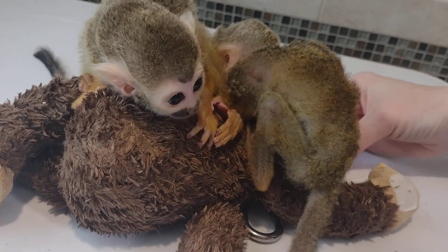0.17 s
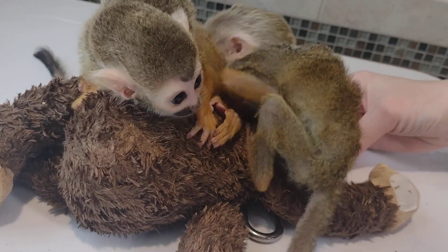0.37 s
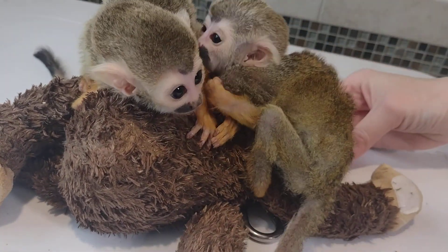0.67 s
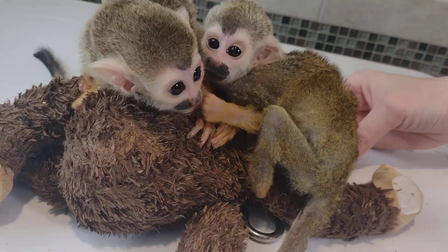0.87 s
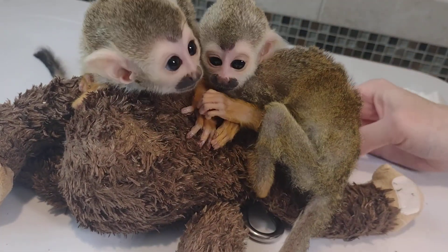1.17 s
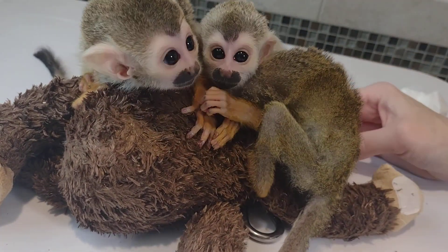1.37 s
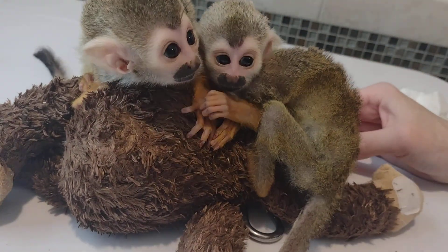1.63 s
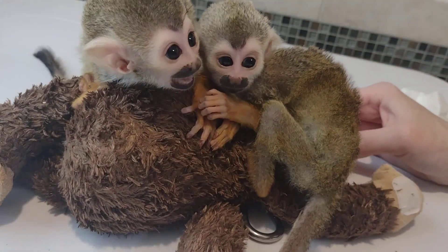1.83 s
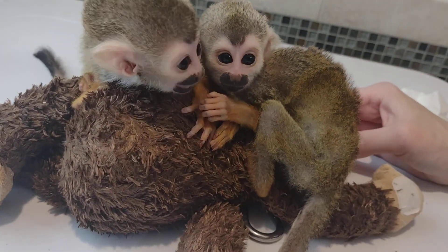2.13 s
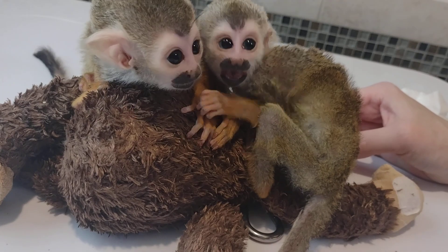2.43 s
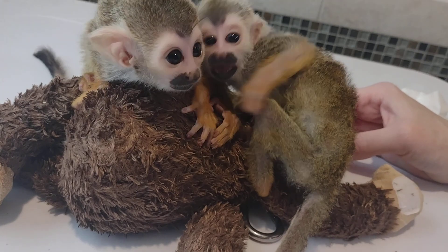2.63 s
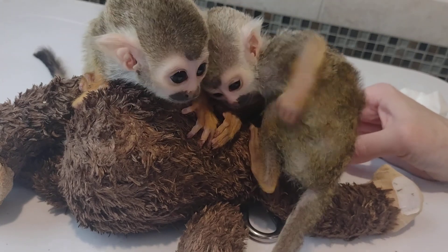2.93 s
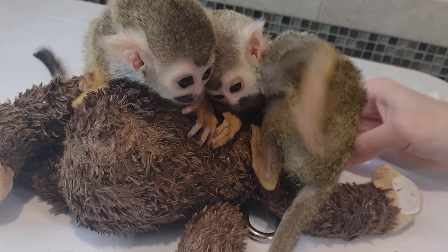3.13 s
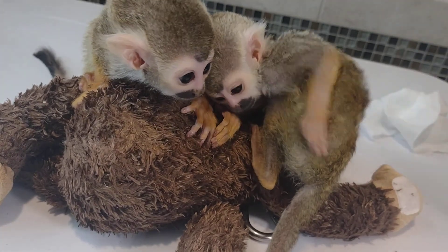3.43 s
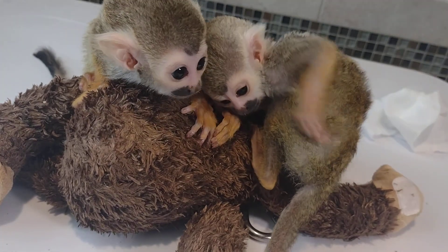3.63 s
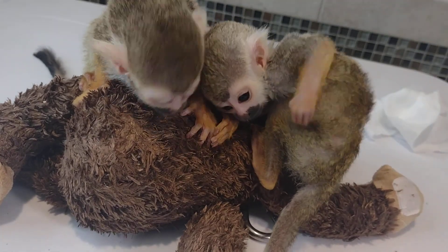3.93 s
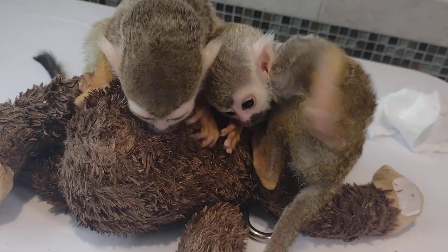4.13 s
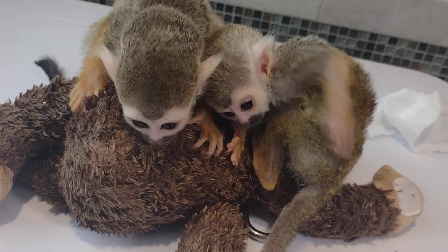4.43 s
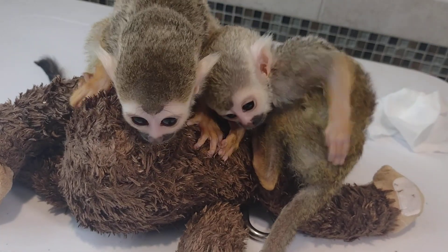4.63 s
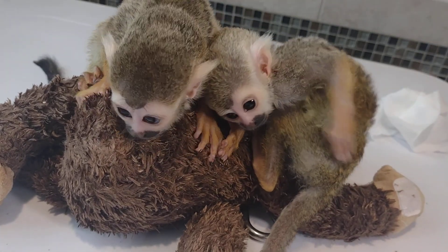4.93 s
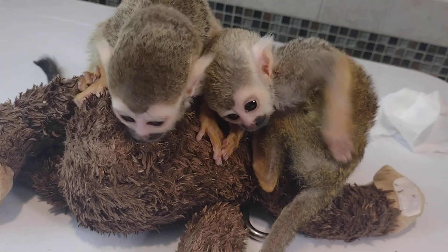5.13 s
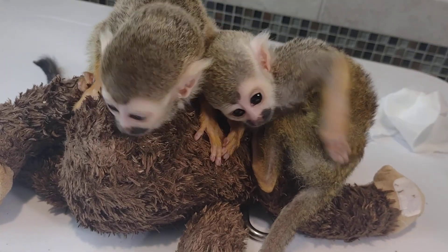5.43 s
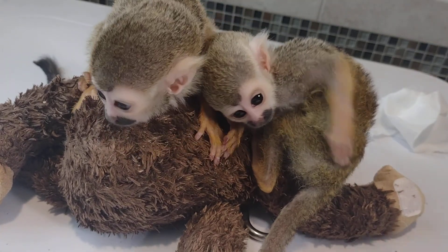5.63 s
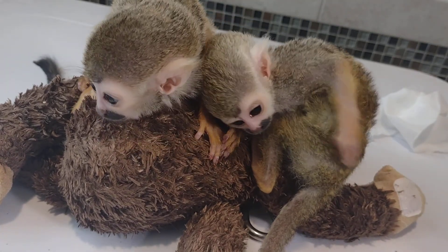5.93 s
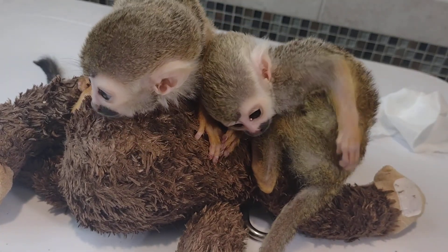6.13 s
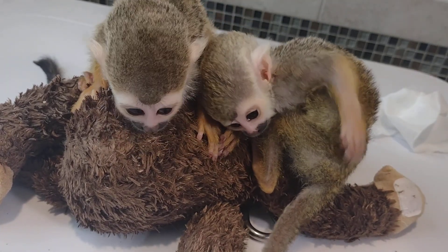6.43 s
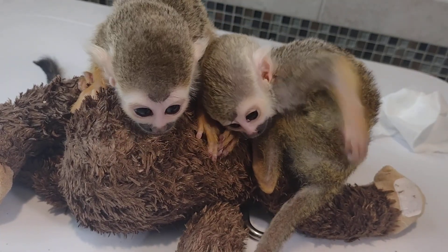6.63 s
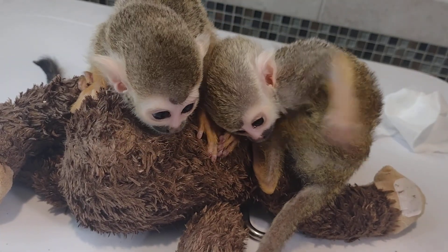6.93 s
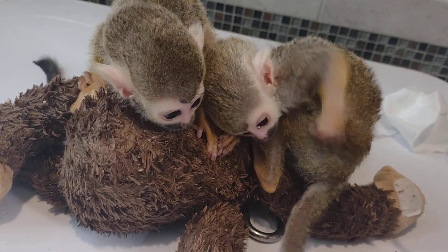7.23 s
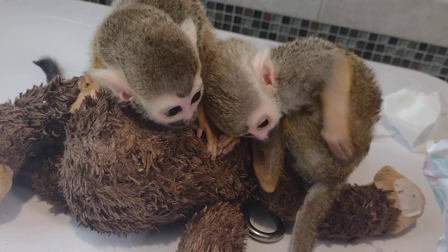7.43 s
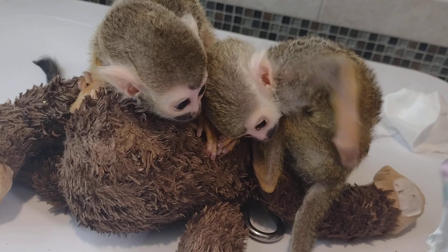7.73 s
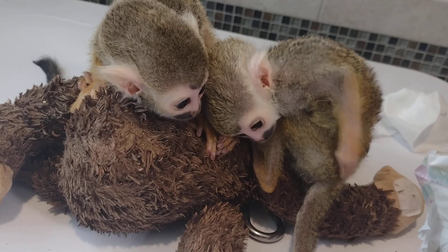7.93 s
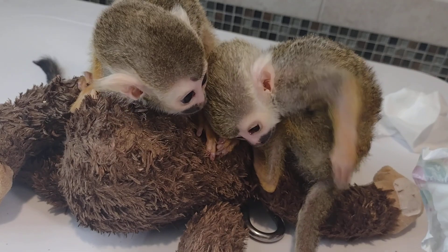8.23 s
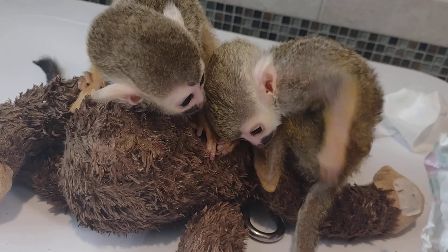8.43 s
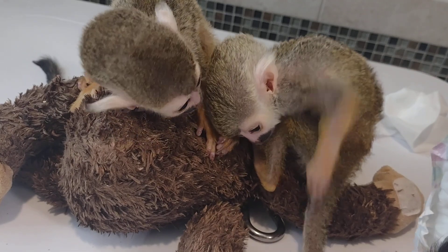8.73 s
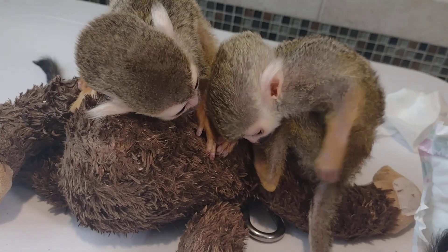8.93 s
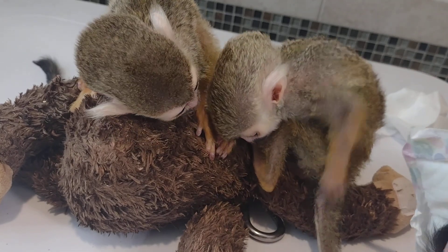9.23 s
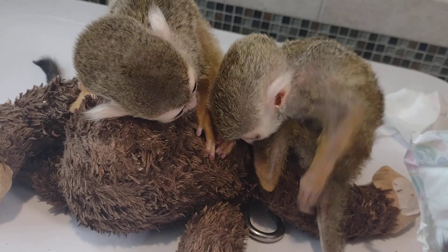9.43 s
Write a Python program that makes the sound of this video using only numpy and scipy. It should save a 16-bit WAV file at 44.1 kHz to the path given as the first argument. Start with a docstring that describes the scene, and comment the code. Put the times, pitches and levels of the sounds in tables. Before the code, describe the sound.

High whistled squeaks and brief nasal grunts from baby monkeys, amid faint scratching, claw ticks and a few knocks on a cabinet.

```python
"""Baby squirrel monkeys in a washbasin

Two baby monkeys cling to a plush toy, close by, in a small tiled room. Their voices give thin
whistled peeps, short nasal grunts and one sharp, plunging call: a "chuck". Fur rustles and claws
tick as they shift and scratch. Something bumps and scrapes on the cabinet and makes it ring.
The basin and tiles add a short echo, and a faint hum lies underneath."""
import sys
import numpy as np
from scipy import signal
from scipy.fft import rfft, irfft
from scipy.io import wavfile
from scipy.ndimage import uniform_filter1d

SR = 44100
rng = np.random.default_rng(int(sys.argv[2]) if len(sys.argv) > 2 else 0)


def materialize(psi):
    """Save the field psi as 16-bit PCM at rate SR to the path in sys.argv[1].

    A 1-D psi becomes a single channel; in a 2-D psi each row is a channel.
    """
    bounded = np.clip(np.atleast_2d(psi).T, -1, 1)
    quanta = np.round(bounded * 32767).astype(np.int16)
    wavfile.write(sys.argv[1], SR, quanta)


N = 422919
TIME = np.arange(N) / SR
TOP_HZ = 15900  # the treble is cut off above this
SNAG_DECAY_S = .0028  # how fast a snag or a claw tick fades

# the tone of rubbed plush: (frequency [Hz], level [dB])
PLUSH_TONE = [(400, -14.5), (1000, -2.5), (1500, -1.5), (1950, -0.5), (2300, 5.5), (2700, 1), (3300, 4),
              (4200, -1.5), (6800, -8.5), (8500, -21.5), (15500, -26.5)]
# the tone of fine hissing hair: (frequency [Hz], level [dB])
HAIR_TONE = [(2000, -26.5), (5000, 3), (7000, 4.5), (10000, 2.5), (15500, -3)]


def undb(db):
    """Turn decibels into a number to multiply by."""
    return 10 ** (np.asarray(db) / 20)


def unit(x):
    """Scale a signal to an average strength (rms) of 1."""
    return x / np.sqrt(np.mean(x ** 2))


def spectrum_db(points, hz):
    """Read the level at hz off a curve of (frequency [Hz], level [dB]) points."""
    f, db = np.transpose(points)
    return np.interp(np.log(hz + 1), np.log(f), db)


def colour(x, points):
    """Shape a signal's tone with such a curve, at strength 1."""
    n = x.shape[-1]
    gain = undb(spectrum_db(points, np.fft.rfftfreq(n, 1 / SR)))
    return unit(irfft(rfft(x) * gain, n))


def muffle(x, hz):
    """Soften the treble above hz."""
    return signal.sosfilt(signal.butter(3, hz, fs=SR, output="sos"), x)


def cut_bass(x, hz):
    """Soften everything below hz."""
    return signal.sosfilt(signal.butter(3, hz, "high", fs=SR, output="sos"), x)


def ring(x, modes):
    """Pass a push through resonances, the pitches at which an object likes to ring."""
    f = np.fft.rfftfreq(N, 1 / SR)
    body = sum(undb(db) * 1j * f * width / (hz ** 2 - f ** 2 + 1j * f * width)
               for hz, width, db in modes)
    return irfft(rfft(x) * body / np.sqrt(np.mean(abs(body) ** 2)), N)


def wander(n, rate):
    """A smooth random wobble of strength 1 that changes about rate times a second."""
    span = max(int(SR / rate), 1)
    smoothed = uniform_filter1d(rng.standard_normal(n), span, mode="wrap")
    return unit(uniform_filter1d(smoothed, span, mode="wrap"))


def stereo_noise(alike_hz=520):
    """Left and right noise: alike in the bass, unrelated above."""
    mid, side = rfft(rng.standard_normal((2, N)))
    alike = .9 / (1 + (np.fft.rfftfreq(N, 1 / SR) / alike_hz) ** 4)
    return unit(irfft(mid * np.sqrt(1 + alike) + np.outer([1, -1], side * np.sqrt(1 - alike)), N))


def place(x, pan_db, lag_s=.00014):
    """Spread a sound over two sides: the left is pan_db louder and slightly later."""
    return np.stack([undb(pan_db / 2) * np.roll(x, int(lag_s * SR)), undb(-pan_db / 2) * x])


def cycles(hz):
    """The running angle (phase) of a wave whose pitch moves."""
    return 2 * np.pi * np.cumsum(hz) / SR


def swell(s, rise, decay):
    """A push that grows up to time s and then dies away."""
    return np.exp(-np.minimum(np.maximum((s - TIME) / rise, (TIME - s) / decay), 20))


def note(s, length, attack_s, release_s):
    """A call's sample positions, its progress from 0 to 1, and its soft fade in and out."""
    at = np.arange(max(int(s * SR), 0), min(int((s + length) * SR), N))
    edges = np.minimum((at - at[0]) / (attack_s * SR), (at[-1] - at) / (release_s * SR))
    return at, np.linspace(0, 1, len(at)), np.sin(np.pi / 2 * np.clip(edges, 0, 1)) ** 2


def background(air_db=-65.5, waver_db=1.0, waver_hz=.6):
    """Still room air and a faint, wavering hum."""
    # the tone of the air: (frequency [Hz], level [dB])
    air_tone = [(27, -33), (40, -7.5), (70, 1.5), (115, -6), (160, -9), (220, -9), (300, -11),
                (1000, -14.5), (2200, -23.5), (8000, -32.5), (15500, -32.5)]
    # the tones in the hum: (pitch [Hz], level [dB])
    hum_tones = [(75.4, -80.5), (134.6, -72.5), (177.6, -79.5), (301.5, -80)]
    hum = np.zeros(N)
    for hz, db in hum_tones:
        level = np.sqrt(2) * undb(db + waver_db * wander(N, 3))
        hum += level * np.sin(cycles(hz + waver_hz * wander(N, 6.1)))
    return undb(air_db) * colour(stereo_noise(), air_tone) + place(hum, 0.93)


def room(x, low_ring_s=0.29, high_ring_s=0.24, split_hz=7500, tail_db=-8, onset_s=0.016):
    """A few early echoes off the basin, then the short ring of the tiles, whose treble dies first."""
    # echoes off the basin and nearest tiles: (left delay [s], right delay [s], level [dB])
    echoes = [(.0031, .0043, -16), (.0078, .0064, -9.5), (0.0122, .0141, -9.5)]
    sing_hz, sing_width_hz, sing_db, sing_s = 5444, 190, -15.5, 0.2406  # the room sings near one pitch
    t = TIME[:SR // 2]
    fall = -np.log(1000) * t  # each ring drops 60 dB in its ring time
    noise = stereo_noise()[:, :len(t)]
    low = muffle(noise, split_hz) * np.exp(fall / low_ring_s)
    middle = signal.lfilter(*signal.butter(1, [300, 4200], "band", fs=SR), low)
    low -= .42 * middle  # the plush soaks up the middle
    high = cut_bass(noise, split_hz) * np.exp(fall / high_ring_s)
    sing = ring(stereo_noise(), [(sing_hz, sing_width_hz, 0)])[:, :len(t)]
    sing *= undb(sing_db) * np.exp(fall / sing_s)
    tail = (low + high + sing) * np.clip(t / onset_s - .5, 0, 1)
    response = undb(tail_db) * unit(tail) / np.sqrt(len(t))
    response[:, 0] += 1  # the direct sound
    for left, right, db in echoes:
        response[[0, 1], [int(left * SR), int(right * SR)]] += undb(db)
    return signal.fftconvolve(x, response, axes=1)[:, :N]


def cabinet(judder_db=1.0, contact_s=.0014, blow_rise_s=.002):
    """Each shove on the cabinet is part padded blow, part shaky scrape, and sets its parts ringing."""
    # shoves: (time [s], thud [dB], boom [dB], knock [dB], rasp [dB], rise [s], decay [s])
    shoves = [(1.437, -55, -52.5, -52.5, -71.5, 0.0039, 0.048),
              (6.064, -72.5, -65.5, -67.5, -67, 0.0044, 0.33), (6.27, -71, -72, -48, -35.5, 0.01, 0.019),
              (6.314, -57, -49, -44.5, -62, 0.03, 0.026), (6.389, -54, -45, -47.5, -54, 0.0012, 0.032),
              (6.606, -59.5, -59, -59, -66, 0.0048, .012), (6.679, -52, -46.5, -54, -50.5, 0.0016, 0.016),
              (6.722, -54.5, -57, -44.5, -44.5, 0.014, 0.017), (6.754, -57, -50, -60, -68, 0.022, 0.036),
              (6.844, -60, -48, -66, -57, 0.0019, .007), (6.897, -79, -54.5, -80, -67.5, 0.019, 0.019)]
    # resonances, all four tables: (frequency [Hz], width [Hz], level [dB])
    frame_thud = [(86, 25, -1), (118, 35, -5.5)]
    panel_boom = [(225, 30, 0)]
    panel_knock = [(317.5, 200, 2.5), (482, 260, -8), (545, 69, -1), (807, 170, -1), (1135, 55, -17.5),
                   (1670, 530, -31)]
    edge_rasp = [(1610, 160, -1.5), (2780, 140, 15), (3100, 90, 16.5), (3280, 87, 12), (6350, 2500, -5)]
    judder = unit(undb(judder_db * wander(N, 440))) * stereo_noise(alike_hz=930)
    contact = np.hanning(int(contact_s * SR))
    force = np.zeros((4, 2, N))
    for s, *levels_db, rise, decay in shoves:
        blow_share = np.exp(-rise / blow_rise_s)  # a faster shove is more of a clean blow
        push = np.sqrt(1 - blow_share) * swell(s, rise, decay) * judder
        blow = np.sqrt(blow_share * decay * SR / 2) * contact / contact.sum()
        push[:, int(s * SR) + np.arange(len(contact))] += blow
        force += undb(levels_db)[:, None, None] * push
    thud, boom, knock, rasp = map(ring, force, (frame_thud, panel_boom, panel_knock, edge_rasp))
    body = cut_bass(thud + boom + knock, hz=62)
    return muffle(body, hz=2800) + muffle(rasp, hz=5000)


def slips(grain_db=3.0, flutter_db=2, snags_per_s=110, snag_size=.55):
    """Tiny slips of random size as the grip catches, lets go and snags, a little to the right."""
    size = undb(grain_db * np.minimum(rng.exponential(size=N), 6) + flutter_db * wander(N, 51))
    snags = (rng.random(N) < snags_per_s / SR) * rng.uniform(0, 2 * snag_size, N)
    size *= 1 + signal.lfilter([1], [1, -np.exp(-1 / (SNAG_DECAY_S * SR))], snags)
    patch = place(rng.standard_normal(N) * size, pan_db=-4, lag_s=.00048)
    return patch + rng.standard_normal((2, N)) * size


def fur(hair_boost_db=3):
    """Countless hairs slip past each other: the plush rustles, and fine hair hisses above it."""
    # steady rubbing as the monkeys shift: (time [s], level [dB], extra level for hair [dB])
    rubbing = [(0, -99, -3), (1.8, -96, 4.5), (1.9, -71, 3), (2.18, -64.5, 6), (2.4, -74.5, -7),
               (2.47, -65.5, 10.5), (2.65, -64.5, 5.5), (3.17, -83, 6), (3.5, -63, -5), (4.55, -65.5, -2.5),
               (4.85, -72.5, -7.5), (5.55, -71.5, -1), (5.95, -91, 2), (7.1, -83.5, 1.5),
               (7.5, -71.5, -16.5), (8.0, -58.5, -19), (8.5, -68, -11), (9.57, -67.5, -21)]
    # strokes of a hand: (time [s], level [dB], rise [s], decay [s], extra level for hair [dB])
    scratches = [(2.225, -66, 0.03, 0.014, 16.5), (2.705, -58.5, 0.0047, 0.011, 3.5),
                 (3.756, -51, 0.0017, 0.0068, 0), (3.995, -65.5, 0.0073, 0.022, 10),
                 (4.1, -60.5, 0.057, 0.042, -7.5), (4.455, -55.5, .025, .03, -7),
                 (4.6, -54, 0.051, 0.023, -9), (3.27, -62.5, 0.018, 0.025, -3),
                 (5.17, -67.5, 0.052, 0.049, 1), (5.598, -63, 0.0035, 0.019, -4),
                 (5.348, -53, 0.0036, 0.021, -12), (7.24, -57.5, 0.045, .09, -3),
                 (7.54, -55, 0.041, 0.021, -8), (7.677, -45, 0.063, 0.0089, -3.5),
                 (7.733, -49.5, .001, .016, -8), (7.841, -41, 0.018, 0.024, -35.5),
                 (7.965, -49.5, .008, 0.0099, -3), (8.08, -46.5, 0.032, 0.0072, -30),
                 (8.745, -54, 0.024, 0.056, -11.5), (9.0, -59, 0.024, 0.16, -19.5),
                 (9.175, -54, .008, 0.01, -7)]
    times, *columns = np.transpose(rubbing)
    db, hiss_db = (np.interp(TIME, times, column) for column in columns)
    plush_level, hair_level = undb(db), undb(db + hiss_db)
    for s, db, rise, decay, hiss_db in scratches:
        stroke = swell(s, rise, decay)
        plush_level = np.hypot(plush_level, stroke * undb(db))
        hair_level = np.hypot(hair_level, stroke * undb(db + hiss_db))
    rustle = plush_level * colour(slips(), PLUSH_TONE)
    hiss = undb(hair_boost_db) * hair_level * colour(slips(), HAIR_TONE)
    return rustle + hiss


def claws(hair_db=-6):
    """A claw catches and lets go: a crisp snap with the tone of plush and hair."""
    # claw ticks: (time [s], level [dB])
    ticks = [(3.752, -49), (3.8795, -45.5), (4.094, -48.5), (4.4174, -42.5), (4.7564, -51.5), (4.611, -48),
             (5.348, -51), (7.0565, -57), (7.598, -44), (7.667, -43), (7.7312, -46.5), (7.822, -45),
             (7.9514, -42), (8.058, -50), (8.7753, -46.5), (8.8744, -51), (8.4712, -48)]
    out = np.zeros((2, N))
    t = TIME[:SR // 50]
    for s, db in ticks:
        noise = rng.standard_normal((2, len(t)))
        snap = colour(noise, PLUSH_TONE) + undb(hair_db) * colour(noise, HAIR_TONE)
        out[:, int(s * SR) + np.arange(len(t))] += undb(db) * np.exp(-t / SNAG_DECAY_S) * snap
    return out


def grunts(jitter=0.067, swell_db=6.5, flicker_db=2.5, harmonics=26):
    """A low, buzzy voice, shaped by the throat, swells, bends down and ends on a croaking push."""
    # grunts: (time [s], length [s], pitch [Hz], downward bend [share of pitch], level [dB],
    # brief dip [dB], roughness [0 = smooth], treble [dB], extra for the top treble [dB])
    calls = [(0.025, 0.082, 582, 0.0072, -47, -2, 0.14, 2, -14),
             (0.926, 0.078, 529, 0.074, -44, 0, 0.24, -1, -0.5),
             (3.368, 0.081, 549.4, 0.036, -44, -4, 1.03, 5, 0.5),
             (8.222, 0.017, 635, 0.056, -48, 0, 0.1, 1, -5),
             (8.276, 0.026, 570.3, 0.0037, -35, 0, 1.05, 8.5, -13.5)]
    # the tone of the throat and mouth: (frequency [Hz], level [dB])
    throat_tone = [(350, -2), (560, 3), (1100, -4.5), (1690, 0.5), (2150, 3.5), (3000, -11), (4100, -12),
                   (4800, -16), (5900, -11.5), (7500, -23), (10000, -30.5), (12000, -11.5), (13300, -25),
                   (15500, -29.5)]
    # the rasp of the last push: (frequency [Hz], level [dB])
    croak_tone = [(300, -36), (550, -2), (1200, -10), (1750, 12), (2200, 5), (3000, -22), (9000, -40)]
    scoop, scoop_s = 0.2344, 0.00721  # the pitch starts this share too high, then settles
    closed_db_per_octave, opening_s = -11, 0.011  # dull until the lips have opened
    push_db, push_lift, push_rough, croak_db = 1, 0.025, 0.2, -2  # the push: louder, higher, rougher
    treble_hz, top_treble_hz = 3200, 9000
    out = np.zeros((2, N))
    k = np.arange(1, harmonics + 1)[:, None]  # harmonics are whole multiples of the pitch
    for s, length, pitch_hz, bend, db, dip_db, roughness, treble_db, top_db in calls:
        at, progress, fade = note(s, length, attack_s=0.18 * length, release_s=0.0087)
        t = progress * length
        dip = np.exp(-((progress - 0.72) / 0.019) ** 2)
        push = np.exp(-((progress - 0.94) / 0.11) ** 2)
        step_down = bend / 2 * np.tanh((progress - .62) / 0.15)
        hz = pitch_hz * (1 + scoop * np.exp(-t / scoop_s) - step_down + push_lift * push)
        rough = roughness * (0.15 + 0.95 * np.sin(np.pi * progress))
        phase = cycles(hz * (1 + jitter * (rough + push_rough * push) * wander(len(at), 865)))
        throat = [(f, gain_db + treble_db * (f > treble_hz) + top_db * (f > top_treble_hz))
                  for f, gain_db in throat_tone]
        lips_db = closed_db_per_octave * np.log2(k) * np.exp(-t / opening_s)
        flicker = np.array([wander(len(at), 110) for _ in k])
        strengths = undb(spectrum_db(throat, k * hz) + lips_db + flicker_db * flicker)
        voice = unit(np.sum(strengths * np.sin(k * phase + rng.uniform(0, 2 * np.pi, k.shape)), axis=0))
        # one bright puff of breath per cycle; the puffs swamp a voice that is pressed hard
        breath = rng.standard_normal(len(at)) * (1 + np.cos(phase))
        puffs = unit(signal.lfilter(*signal.butter(2, 1400, "high", fs=SR), colour(breath, throat)))
        puff_gain = rough * (1 + rough)
        croak = undb(croak_db) * push * colour(breath, croak_tone)
        grunt = (voice + puff_gain * puffs) / np.hypot(1, puff_gain) + croak
        effort_db = swell_db * (progress - .5) + dip_db * dip + push_db * push
        out[:, at] += place(grunt * fade * undb(db + effort_db), pan_db=1.2)
    return out


def chuck(start_s=8.213, break_after_s=0.011):
    """A whistle plunges so fast that it sounds like a click, then the voice breaks into a harsh note."""
    # the tone of the wide-open mouth: (frequency [Hz], level [dB])
    mouth_tone = [(1500, -48.5), (2400, -24), (3300, -12), (4400, -13.5), (5500, 0), (6900, 2), (8000, -16),
                  (9200, -14.5), (10800, -0.5), (11900, -23), (13000, -12.5), (15500, -15)]
    from_hz, towards_hz, plunge_s, glide_s, plunge_db, drop_db = 8000, 4300, 0.014, .0085, -24, 1
    mouth_hz, mouth_width_hz, octave_db = 11150, 560, 9.5  # the mouth lifts the octave near this pitch
    harsh_hz, harsh_s, harsh_db, harsh_octave_db = 3270, 0.0221, -18, -4
    sag, jitter, rough, rasp_db = .1, .06, 0.87, -1  # sag and jitter are shares of the pitch
    out = np.zeros(N)
    at, progress, fade = note(start_s, plunge_s, attack_s=.0035, release_s=.0015)
    hz = towards_hz + (from_hz - towards_hz) * np.exp(-progress * plunge_s / glide_s)
    lift = 1 / (1 + ((2 * hz - mouth_hz) / mouth_width_hz) ** 2)
    whistle = (1 - lift / 2) * np.sin(cycles(hz)) + undb(octave_db) * lift * np.sin(2 * cycles(hz))
    out[at] += np.sqrt(2) * whistle * fade * undb(plunge_db - drop_db * (progress - .5))
    # the harsh note is more rasp than tone
    at, progress, fade = note(start_s + break_after_s, harsh_s, attack_s=0.0073, release_s=0.0021)
    phase = cycles(harsh_hz * (1 - sag * (progress - .5) + jitter * wander(len(at), 1500)))
    tone = np.sin(phase) + undb(harsh_octave_db) * np.sin(2 * phase)
    breath = colour(rng.standard_normal(len(at)), mouth_tone)
    rasp = undb(rasp_db) * rough * breath * (1 + 0.1 * np.cos(phase))
    out[at] += (np.sqrt(2) * (1 - 0.84 * rough) * tone + rasp) * fade * undb(harsh_db)
    return place(out, pan_db=2, lag_s=.00003)


def peeps(octave_db=-21, weak_db=-40):
    """Almost pure whistles that hold a pitch, then slide to another; the lowest adds a faint octave."""
    # peeps: (time [s], length [s], first pitch [Hz], last pitch [Hz], hold [share of length],
    # level [dB], swell [dB], left minus right [dB])
    calls = [(1.777, 0.037, 7520, 8580, 0.05, -29.5, 14.5, 9), (2.037, 0.1, 8880, 9380, 0.05, -57, 10, 5),
             (2.125, 0.041, 9180, 8930, 0.05, -46.5, 1, 1),
             (2.16, 0.015, 8720, 8160, 0.04, -31.5, 10.5, -0.5),
             (2.459, 0.026, 9284, 10120, 0.6, -15.5, 1.5, -1.5),
             (2.511, 0.043, 11380, 12320, 0.39, -16.5, -1, 3),
             (2.564, 0.02, 12100, 12090, .05, -19, -6.5, 8),
             (6.577, 0.024, 9690, 10250, 0.52, -30.5, 17.5, -0.5),
             (6.785, 0.019, 11000, 10840, 0.13, -29, 0.5, -10.5),
             (6.88, 0.031, 10430, 9450, 0.05, -18.5, 3, 0.5)]
    out = np.zeros((2, N))
    for s, length, from_hz, to_hz, hold, db, swell_db, pan_db in calls:
        at, progress, fade = note(s, length, attack_s=0.0053, release_s=0.003)
        slide = np.sin(np.pi / 2 * np.clip((progress - hold) / (1 - hold), 0, 1)) ** 2
        hz = from_hz + (to_hz - from_hz) * slide
        jitter = .014 if db < weak_db else .002  # a weak peep is unsteady
        phase = cycles(hz * (1 + jitter * wander(len(at), 830)))
        tone = np.sin(phase) + undb(octave_db) * (hz.min() < TOP_HZ / 2) * np.sin(2 * phase)
        out[:, at] += place(np.sqrt(2) * tone * fade * undb(db + swell_db * (progress - .5)), pan_db)
    return out


def scene():
    """Balance the voices, fur, claws and cabinet, and let them echo in the room over the hum."""
    voices = undb(2.0) * peeps() + chuck() + undb(-1.0) * grunts()
    movement = fur() + claws() + undb(-0.5) * cabinet()
    return room(voices + movement) + background()


def record(dry):
    """Cut off the highest treble steeply."""
    return signal.sosfilt(signal.ellip(10, .2, 70, TOP_HZ, fs=SR, output="sos"), dry)


dry = scene()
out = record(dry)
materialize(out)
```